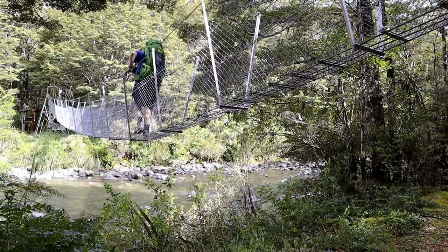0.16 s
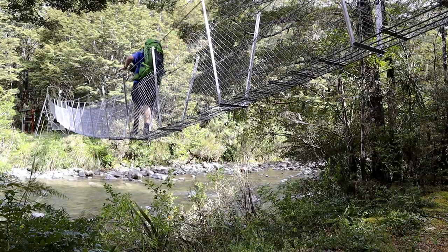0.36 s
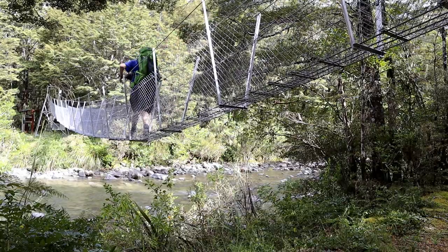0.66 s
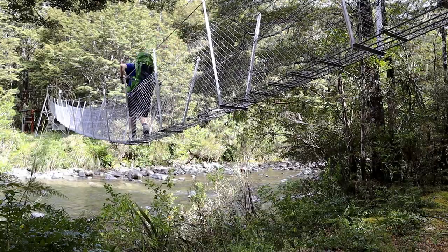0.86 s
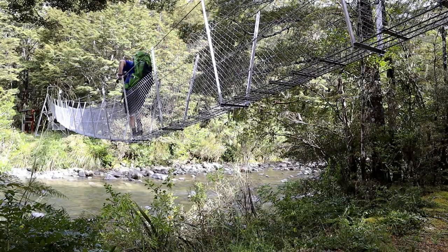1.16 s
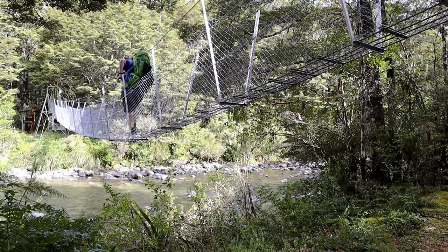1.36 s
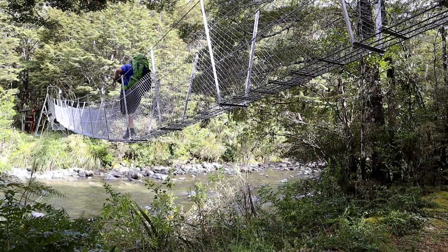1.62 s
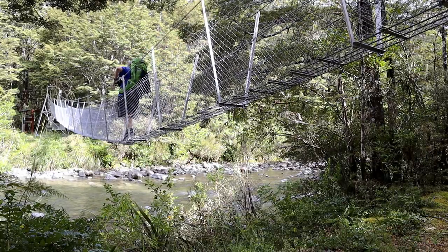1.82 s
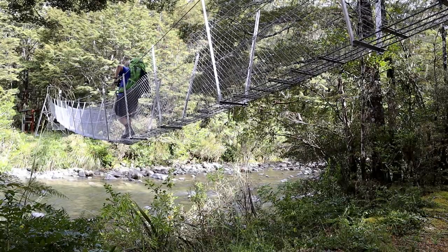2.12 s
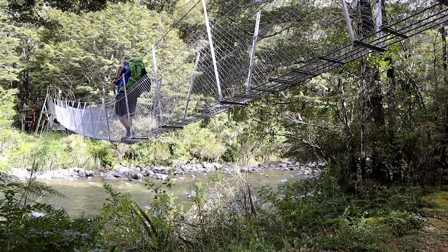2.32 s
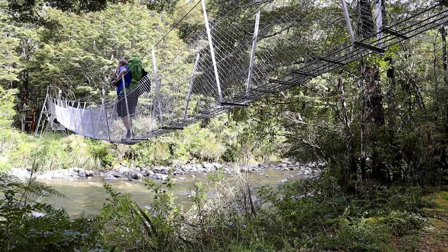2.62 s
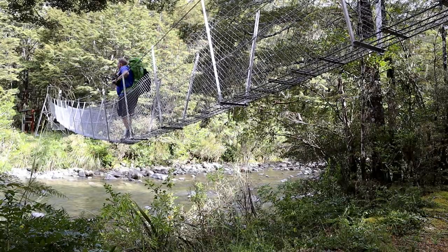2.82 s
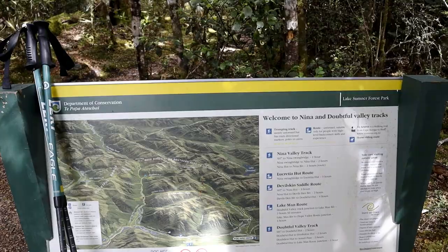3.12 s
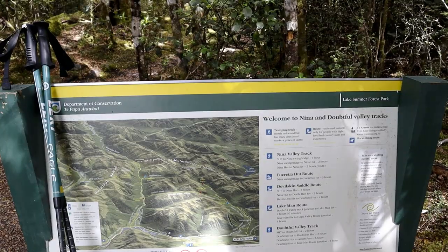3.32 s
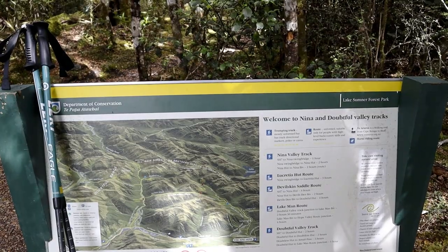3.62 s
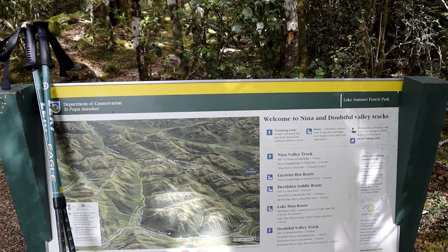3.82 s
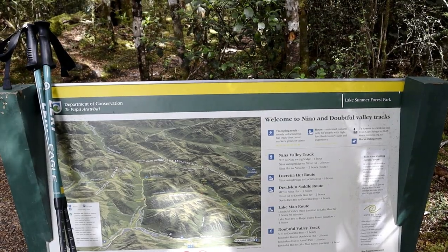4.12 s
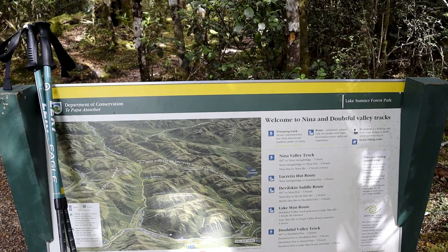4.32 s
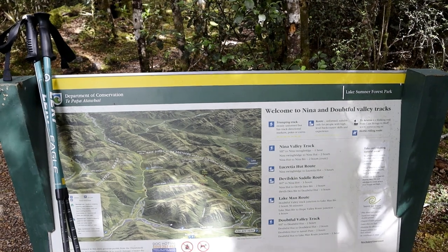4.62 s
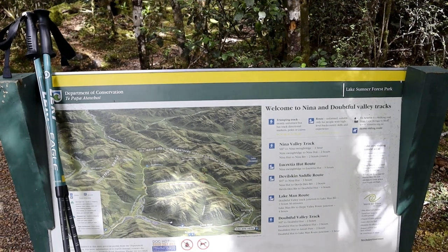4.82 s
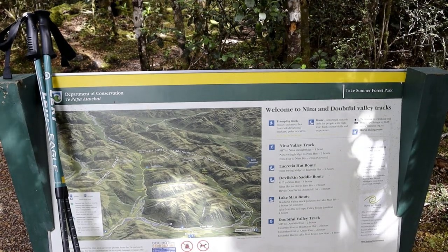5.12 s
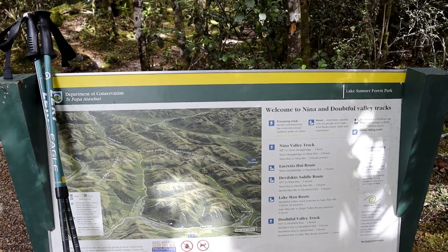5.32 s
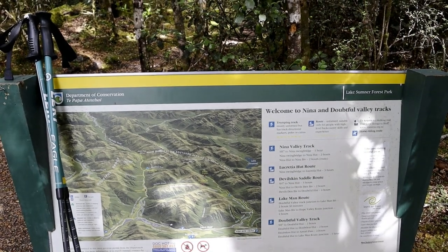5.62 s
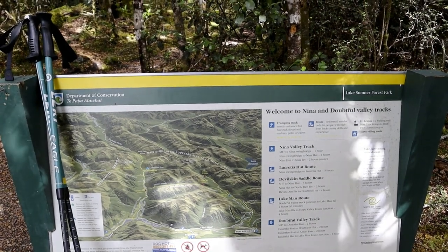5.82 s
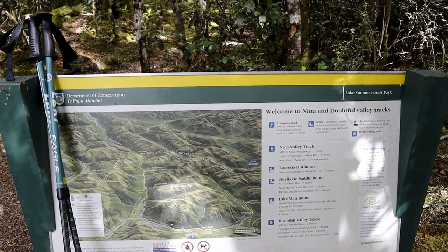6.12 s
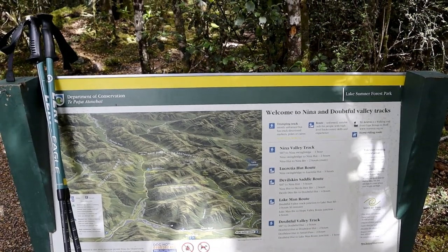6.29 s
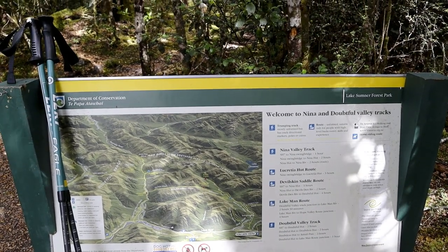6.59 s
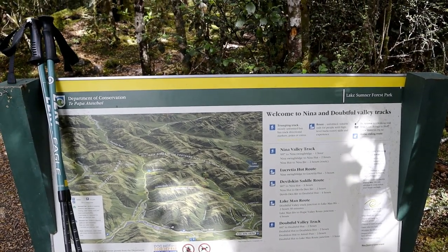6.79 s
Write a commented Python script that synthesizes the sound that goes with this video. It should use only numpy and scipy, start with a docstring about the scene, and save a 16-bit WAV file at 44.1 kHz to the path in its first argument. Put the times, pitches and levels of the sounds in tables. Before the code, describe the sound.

From 0 to 3 seconds, a wide, steady rush of river water over stones fills the space. A deep wavering rumble bumps strongly in the first half second, then dies away. A low knock sounds near 0.1 and a faint wire ring near 0.3. Steps rattle the mesh in dry, grainy bursts, strongest around 0.8-1.0, again at 1.8-2.05, lightly at 2.3 and 2.9. A near cicada pulses about thirteen times a second, growing clearer from 0.8, over a very high hissing chorus. At 3.07 everything dips briefly, then a far quieter forest edge opens with soft distant wash and chorus. A thin cicada pulsing about sixteen times a second enters at 3.6 and fades by 5.6; a slightly lower one rises from 5.1 and stays strong to the end at 7. A faint falling bird whistle comes at 5.5-5.7, then a tiny sharp twig snap on the left at 5.7.

```python
"""River footbridge, then forest edge

A river rushes over stones under a wire footbridge while a low rumble dies away, a walker rattles the mesh
and a cicada throbs over a far chorus. After a short fade comes a quiet forest edge: a distant wash, other
cicadas, a faint bird and a twig that snaps. Water, chorus, rattles and bird are shaped noise, the rumble's
hum and the wire rings are sine tones, and each near cicada is a train of clicks through a resonance.
"""
import sys
import numpy as np
from scipy import signal
from scipy.fft import next_fast_len
from scipy.io import wavfile
from scipy.ndimage import uniform_filter1d

SR = 44100
rng = np.random.default_rng(int(sys.argv[2]) if len(sys.argv) > 2 else 0)


def materialize(psi):
    """Save the field psi as 16-bit PCM at rate SR to the path in sys.argv[1].

    A 1-D psi becomes a single channel; in a 2-D psi each row is a channel.
    """
    bounded = np.clip(np.atleast_2d(psi).T, -1, 1)
    quanta = np.round(bounded * 32767).astype(np.int16)
    wavfile.write(sys.argv[1], SR, quanta)


N = 306495
T = np.arange(N) / SR  # time in seconds
FRAMES, HZ = N // 256 + 5, np.fft.rfftfreq(1024, 1 / SR)  # short-time spectra: how many, frequencies

# How wide the noise sounds, by the river and then at the forest edge; treble is wider than bass.
# Each row: frequency in Hz, side over mid in dB.
WIDTH = [
    [(60, -19), (110, -16), (200, -9.5), (380, -11), (700, -5), (1290, 2), (2380, 1), (4400, 3.5),
     (7000, 2.5), (9000, 2)],
    [(60, -17), (110, -4.5), (200, -3), (380, -5.5), (700, -2.5), (1290, 2), (2380, 4), (4400, 5),
     (6500, 10), (8500, 14)],
]


def gain_of(db):
    """Turns decibels into an amplitude factor."""
    return 10 ** (np.asarray(db) / 20)


def evened(x):
    """Scales a signal to an average strength (rms) of 1."""
    return x / np.sqrt(np.mean(x ** 2) + 1e-20)


def read(points, hz):
    """Reads a table over frequency, joining its points on a log axis."""
    f, value = np.transpose(points)
    return np.interp(np.log(hz + 1), np.log(f + 1), value)


def add(mix, s, sound):
    """Mixes a sound into the mix, starting at second s."""
    part = mix[..., round(s * SR):][..., :sound.shape[-1]]
    part += sound[..., :part.shape[-1]]


def left_right(mid, side):
    """Turns mid (what both ears share) and side (how they differ) into left and right."""
    return np.array([mid + side, mid - side])


def pan(left_over_right_db):
    """Gives the gains that make left louder than right by this many dB."""
    return gain_of([[left_over_right_db / 2], [-left_over_right_db / 2]])


def resonate(x, hz, width_hz):
    """Shifts hz down to zero, smooths and shifts back: a resonance of gain 1 whose pitch may move."""
    turn = np.exp(2j * np.pi * np.cumsum(hz * np.ones(len(x))) / SR)
    memory = np.exp(-np.pi * width_hz / SR)
    smooth = signal.lfilter([1 - memory], [1, -memory], x * turn.conj())
    return 2 * (turn * smooth).real


def noise_pair(patchy_db, flicker_db):
    """Makes two unrelated random short-time spectra sharing drifting patches and a wide flicker."""
    a, b, c, d, patches = rng.standard_normal((FRAMES, len(HZ), 5)).T
    patches = uniform_filter1d(patches, size=12, axis=0)  # smooth over frequency
    patches = evened(uniform_filter1d(patches, size=10, axis=1))  # smooth over time
    flicker = evened(uniform_filter1d(rng.standard_normal(FRAMES), size=6))
    return np.array([a + 1j * b, c + 1j * d]) * gain_of(patchy_db * patches + flicker_db * flicker)


def sound_of(spectra):
    """Turns short-time spectra back into samples."""
    return signal.istft(spectra, nperseg=1024, noverlap=768)[1][..., :N]


def wash(place):
    """Broken water and air make noise: four overlapping layers, each rising and falling on its own."""
    # Tone colour of the noise at each place. Each row: frequency in Hz, relative strength in dB per Hz.
    colour = [
        [(15, -33), (25, 5), (70, 1.5), (167, -6.5), (286, -11.5), (349, -11.5), (404, -13), (640, -10),
         (870, -11.5), (1080, -16), (1420, -17.5), (2690, -21), (5110, -28), (8360, -32), (9000, -30),
         (11700, -38), (19800, -120)],
        [(15, -32), (25, -3), (48, 3.5), (114, -6.5), (239, -5), (313, -3.5), (345, -2), (381, -5.5),
         (578, -4.5), (877, -7), (1660, -10), (6240, -21.5), (7600, -22.5), (8800, -27), (11400, -55),
         (19400, -120)],
    ]
    # Balance at each place. Each row: frequency in Hz, left over right in dB.
    balance = [
        [(60, 1), (180, 0), (550, -4.5), (1650, -3.5), (4970, -0.5), (15000, 1)],
        [(60, -0.5), (180, 1), (550, -2), (1650, -1.5), (4970, 0), (15000, 0)],
    ]
    # Centres of rumble, roar, rush and rustle, in Hz.
    layer_hz = [70, 600, 2500, 7500]
    # Loudness of the layers at each place.
    # Each row: time in seconds, then mid level in dB of rumble, roar, rush and rustle.
    layer_levels = [
        [(0.0, -38, -31, -44, -47.5), (0.09, -30, -34.5, -44, -54.5), (0.38, -42.5, -32.5, -43, -51.5),
         (0.67, -33, -35, -45, -54), (0.86, -35, -35, -42, -45), (1.05, -34.5, -35, -44.5, -51),
         (1.72, -36.5, -36.5, -44, -55), (1.87, -39.5, -36, -44.5, -49.5), (2.89, -43, -38.5, -44.5, -59),
         (3.03, -40, -38.5, -45.5, -56)],
        [(3.12, -53, -45.5, -53, -73), (3.25, -53.5, -48, -52.5, -72), (4.1, -53, -47.5, -53, -71),
         (4.9, -54, -47.5, -52, -77.5), (5.6, -53, -47.5, -53.5, -70), (6.2, -52, -47.5, -52, -71),
         (6.95, -53, -47, -52, -72.5)],
    ]

    mid, side = noise_pair(patchy_db=.95, flicker_db=.15) * gain_of(read(colour[place], HZ))[:, None]
    side = side * gain_of(read(WIDTH[place], HZ))[:, None]
    half_lean_db = read(balance[place], HZ)[:, None] / 2
    spectra = left_right(mid, side) * gain_of([half_lean_db, -half_lean_db])
    s, *levels_db = np.transpose(layer_levels[place])
    out = np.zeros((2, N))
    for share, db in zip(np.eye(len(layer_hz)), levels_db):
        # each layer fades into its neighbours, so together they cover every frequency
        layer = sound_of(spectra * read(list(zip(layer_hz, share)), HZ)[:, None])
        out += layer / layer.mean(0).std() * gain_of(np.interp(T, s, db))
    return out


def drone():
    """The hum inside the rumble: low sine tones that waver in pitch, each swelling on its own."""
    # The tones. Each row: frequency in Hz, typical (rms) pitch waver in Hz.
    tones = [(46, 4.97), (87, 4.1), (138, 7.9)]
    # Their loudness. Each row: time in seconds, then rms level in dB of each tone.
    tone_levels = [(0.0, -40, -35, -53), (.07, -40, -33, -50), (0.11, -40, -27, -41), (.145, -36, -28, -42),
                   (.175, -35, -38, -48), (0.21, -37, -41, -46), (.3, -28, -40, -55), (.45, -45, -33, -57),
                   (0.619, -29, -50, -52), (.85, -43, -49, -47), (1.03, -33, -41, -51),
                   (1.37, -46, -49, -50), (1.55, -43, -42, -40), (1.75, -47, -39.5, -51.5),
                   (2.0, -48, -41.5, -61), (2.5, -42, -46, -60), (3.03, -52, -59, -57)]

    s, *levels_db = np.transpose(tone_levels)
    drift = uniform_filter1d(rng.standard_normal((len(tones), N)), size=2500)
    drift = uniform_filter1d(drift, size=2500)
    out = np.zeros(N)
    for wander, (hz, waver_hz), db in zip(drift, tones, levels_db):
        cycles = np.cumsum(hz + waver_hz * evened(wander)) / SR
        out += np.sqrt(2) * gain_of(np.interp(T, s, db)) * np.sin(2 * np.pi * cycles)
    return out


def chorus(place):
    """Many far cicadas blur into a band of hiss."""
    # Tone colour at each place. Each row: frequency in Hz, relative strength in dB per Hz.
    colour = [
        [(6000, -30), (8700, -11), (9600, -7), (10500, 5), (11300, 3.5), (12300, 4.5), (13500, -6.5),
         (14300, -6), (14800, -32), (15300, -50)],
        [(6000, -44), (8900, -20.5), (9700, -0.5), (10500, 6.5), (11300, 7), (12300, 4.5), (13500, -6.5),
         (14200, -6), (14700, -42), (15300, -50)],
    ]
    # Loudness at each place. Each row: time in seconds, mid level in dB.
    loudness = [
        [(0, -45.5), (.1, -52.5), (.23, -47.5), (.35, -51), (.5, -50), (1, -51.5), (2, -48.5), (3.03, -50.5)],
        [(3.12, -55.5), (3.5, -54.5), (3.82, -55), (3.91, -51.5), (4.0, -53), (4.5, -54.5), (5, -52),
         (5.5, -50.5), (6.2, -51.5), (6.95, -51)],
    ]
    # Side over mid in dB, one number for each place.
    side_db = [7, 8.5]

    spectra = noise_pair(patchy_db=1.5, flicker_db=.5) * gain_of(read(colour[place], HZ))[:, None]
    mid, side = sound_of(spectra)
    level = gain_of(np.interp(T, *np.transpose(loudness[place])))
    return level * left_right(evened(mid), gain_of(side_db[place]) * evened(side))


def bird():
    """One faint, fuzzy, falling whistle far away: noise through a narrow resonance that moves in pitch."""
    # The whistle's path. Each row: time in seconds, frequency in Hz, level in dB.
    path = [(5.52, 8300, -67), (5.56, 8000, -62), (5.59, 7500, -62), (5.61, 7400, -70), (5.64, 7300, -63),
            (5.665, 7600, -63), (5.678, 7300, -72), (5.687, 6900, -63), (5.693, 6900, -76)]

    s, hz, db = np.transpose(path)
    t, out = np.arange(s[0], s[-1], 1 / SR), np.zeros(N)
    fuzz = resonate(rng.standard_normal(len(t)), np.interp(t, s, hz), width_hz=500)
    add(out, s[0], gain_of(np.interp(t, s, db)) * evened(fuzz))
    return out


def throbs(voice):
    """Steady throbs at the pace of the moment, each a little early or late, louder or softer."""
    # Pace of three near cicadas: by the river, then a high and a low voice at the forest edge.
    # Each row: time in seconds (the first is the first throb), gap to the next throb in seconds.
    pace = [
        [(.066, .0758), (1.13, .0758), (1.2, .074)],
        [(3.64, .0614), (4.07, .0614), (4.125, .0593)],
        [(5.124, .0591)],
    ]
    # How hard each one sings. Each row: time in seconds, side level in dB.
    effort = [
        [(.066, -47), (.55, -44), (.8, -35.5), (1.13, -38.5), (2.0, -39), (3.0, -36)],
        [(3.636, -48), (3.77, -43.5), (3.9, -45), (4.1, -43), (4.3, -44), (4.6, -44), (4.8, -45), (5.0, -48),
         (5.4, -50), (5.61, -58)],
        [(5.124, -57), (5.45, -46), (5.6, -42.5), (6.1, -39.5), (6.55, -40), (6.92, -39.5)],
    ]
    timing_spread_s, loudness_spread_db = .0015, 1.0

    s, db = np.transpose(effort[voice])
    times = [pace[voice][0][0]]
    while times[-1] < s[-1]:
        times.append(times[-1] + np.interp(times[-1], *np.transpose(pace[voice])))
    times = np.array(times[:-1])
    late, strong = rng.standard_normal((60, 2))[:len(times)].T
    return zip(times + timing_spread_s * late, np.interp(times, s, db) + loudness_spread_db * strong)


def cicada(voice):
    """Each throb is a short train of clicks ringing the body, which sags in pitch; the trees echo it."""
    # The three voices. Each row: clicks a second, throb length in seconds, body resonance in Hz,
    # width of each resonance pass in Hz, pitch sag over a throb in Hz, mid against side in dB,
    # echo against direct sound in dB, time for the echo to fall by 60 dB in seconds.
    voices = [(301, 0.022, 10800, 3600, 880, -11.5, 4, 0.17), (391, 0.018, 12000, 3700, 930, -5.5, 1, 0.19),
              (399, 0.025, 10970, 2630, 540, -6, -4.5, 0.084)]
    click_spread_db, click_spread_s = 2.2, .0001

    rate, length, rest_hz, width_hz, sag_hz, mid_db, echo_db, t60 = voices[voice]
    clicks, age = np.zeros(N), np.zeros(N)  # age: seconds since the latest throb began
    at = np.arange(0, length * 0.91, 1 / rate)
    # the first clicks are weaker, and the last ones fade
    fading = np.minimum(0.7 + at / 0.0098, 1) / (1 + (at / length) ** 6)
    chance = rng.standard_normal((60, 3, 30))[..., :len(at)]
    for (s, db), (size, shift, sign) in zip(throbs(voice), chance):
        places = np.minimum(((s + at + click_spread_s * shift) * SR).astype(int), N - 1)
        clicks[places] = gain_of(db + click_spread_db * size) * fading * np.sign(sign)
        start = round(s * SR) - 40  # slightly early, to cover clicks that come early
        age[start:] = T[start:] - s
    body_hz = rest_hz + sag_hz * (.5 - np.clip(age / length, 0, 1))
    ring = clicks * 0.47 * SR / np.sqrt(rate * width_hz)  # makes the level within a throb close to its dB
    for _ in range(5):  # repeated: a steep-sided band
        ring = resonate(ring, body_hz, width_hz)

    t = T[:SR // 5]
    trees = rng.standard_normal((2, len(t))) * gain_of(-60 * t / t60) * np.minimum(t / 0.0017, 1)
    trees = trees / np.linalg.norm(trees[0])
    echo_mid, echo_side = gain_of(echo_db) * signal.oaconvolve(ring[None], trees, axes=1)[:, :N]
    # off to one side: a quarter turn between mid and side
    shifted = signal.hilbert(ring, next_fast_len(N))[:N].imag
    return left_right(gain_of(mid_db) * (shifted + echo_mid), ring + echo_side)


def twig_snap():
    """A twig snaps: one short swing of pressure that rises and dies within a cycle or two."""
    # Each row: start in seconds, mid peak in dB, left over right in dB, side over mid in dB.
    snaps = [(5.7012, -32, 11, 1)]
    swing_hz, cycles = 5600, 1.4

    out = np.zeros((2, N))
    for s, db, pan_db, side_db in snaps:
        turns = np.arange(0, cycles, swing_hz / SR)
        swing = np.cos(2 * np.pi * (turns - cycles / 2))
        click = gain_of(db) * swing * np.sin(np.pi * turns / cycles)
        add(out, s, left_right(click, gain_of(side_db) * click) * pan(pan_db))
    return out


def clinks():
    """Wire rings and the deck knocks low: fading sine tones with a rough flutter, some gliding in pitch."""
    # Each row: start in seconds, level in dB before fading and flutter, frequency in Hz,
    # time to fall by 60 dB in seconds, left over right in dB, pitch glide in Hz a second.
    rings = [(.127, -23, 264, 0.14, -4, 400), (0.27, -37.5, 1783, 0.48, -10, 0),
             (0.817, -33, 7300, .05, 5, 40000), (.8304, -44, 7100, 0.06, -2, 0),
             (1.97, -35, 6950, 0.043, 8, 0)]
    rough_cycles = 5  # length of the rise and of the flutter's smoothing, in cycles of the ring

    out, t = np.zeros((2, N)), T[:SR // 3]
    for s, db, hz, t60, pan_db, glide in rings:
        flutter = uniform_filter1d(rng.standard_normal(len(t)), size=round(rough_cycles * SR / hz))
        rough = 1 + 0.5 * evened(flutter)
        rise = np.minimum(t * hz / rough_cycles, 1) ** .5
        tone = np.sin(2 * np.pi * (hz + glide * t / 2) * t)
        ring = gain_of(db - 60 * t / t60) * rise * rough * tone
        add(out, s, left_right(ring, 0.26 * ring) * pan(pan_db))
    return out


def rattles():
    """Steps thud on and rattle the mesh: quick bursts of band noise, grainy as the links knock unevenly."""
    # Each row: end of the rise in seconds, mid level there in dB before the grain, centre in Hz,
    # time to fall by 60 dB in seconds, left over right in dB.
    hits = [(.458, -44, 6000, 0.13, 1), (.788, -41.5, 5160, 0.21, 4), (.81, -44, 2190, 0.15, 3),
            (0.842, -48, 9000, 0.28, 5), (.872, -60, 5500, .2, 1), (.944, -32.5, 3020, 0.056, 0.5),
            (.975, -51, 6000, .15, 0), (.933, -47, 9500, 0.17, 0), (0.943, -35.5, 8500, 0.043, 3),
            (0.949, -37, 8500, .24, 3), (1.777, -44.5, 7500, 0.18, 4), (1.83, -49, 8000, 0.26, 2),
            (1.957, -42, 5000, 0.06, 2), (1.985, -45, 5500, 0.15, 1), (2.048, -40, 3000, 0.049, -4),
            (2.27, -51, 8000, 0.13, 3), (2.317, -49, 8500, 0.27, 1), (2.342, -47, 6500, 0.16, 1),
            (2.38, -50, 5000, 0.23, 1), (2.907, -45, 8350, 0.23, 3)]
    width_over_centre, rise_over_t60, top_hz = 1.12, .22, 12000
    grain_db, grain_cycles = 2.8, 4  # spread of the knocks, and their smoothing in cycles of the centre

    out, t = np.zeros((2, N)), T[:SR // 3]
    dull = signal.butter(4, top_hz, fs=SR, output="sos")
    for s, db, hz, t60, pan_db in hits:
        width_hz, rise = width_over_centre * hz, rise_over_t60 * t60
        knocks = uniform_filter1d(rng.standard_normal((2, len(t))), size=round(grain_cycles * SR / hz))
        grain = gain_of(grain_db * evened(knocks))
        burst = []
        for noise in rng.standard_normal((2, len(t))):
            band = resonate(resonate(noise, hz, width_hz), hz, width_hz)
            burst.append(evened(signal.sosfilt(dull, band)))
        fall = gain_of(db - 60 * np.maximum(t - rise, 0) / t60)
        shape = grain * fall * np.minimum(t / rise, 1) ** 2
        mid, side = burst * shape * gain_of([[0], [read(WIDTH[0], hz)]])
        add(out, s - rise, left_right(mid, side) * pan(pan_db))
    return out


def scene():
    """The river fades out and the forest edge fades in, with a brief dip between the two places."""
    fade_s, ramp_s = 3.073, 0.048  # middle of the dip, length of each ramp
    cicada_lean = pan(-1)  # cicadas a little louder on the right
    river = wash(0) + drone() + cicada_lean * (chorus(0) + cicada(0))
    forest = wash(1) + bird() + cicada_lean * (chorus(1) + cicada(1) + cicada(2))
    small_hits = twig_snap() + clinks() + rattles()
    ramp = np.clip(abs(T - fade_s) / ramp_s, 0, 1)
    fade = 0.029 + np.sin(np.pi / 2 * ramp) ** 2  # the dip never reaches full silence
    return fade * (np.where(T < fade_s, river, forest) + small_hits)


def record(dry):
    """The microphone's low cut at 33 Hz, then a band limit at 15 kHz."""
    cut = signal.sosfilt(signal.butter(4, 33., "highpass", fs=SR, output="sos"), dry)
    band_limit = signal.firwin(511, 15000, window=("kaiser", 9), fs=SR)
    return signal.oaconvolve(cut, band_limit[None], "same")


dry = scene()
out = record(dry)
materialize(out)
```